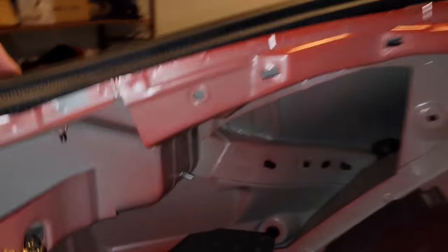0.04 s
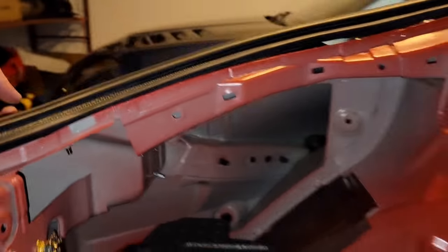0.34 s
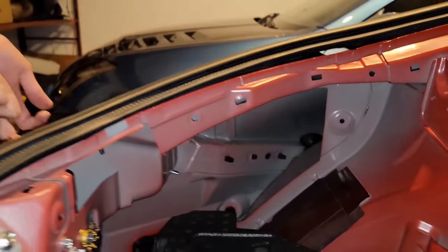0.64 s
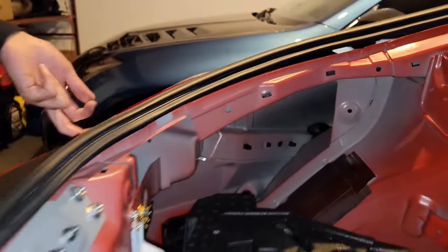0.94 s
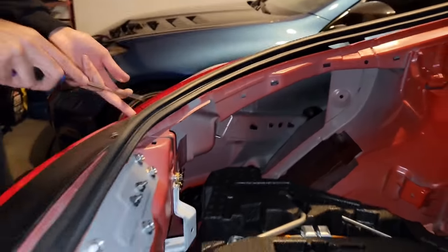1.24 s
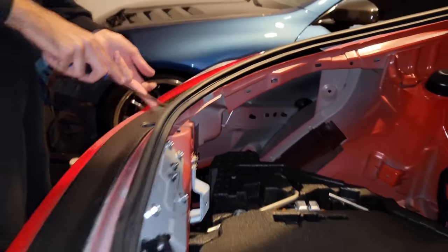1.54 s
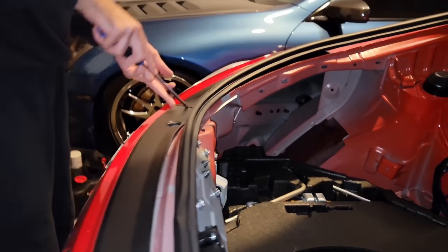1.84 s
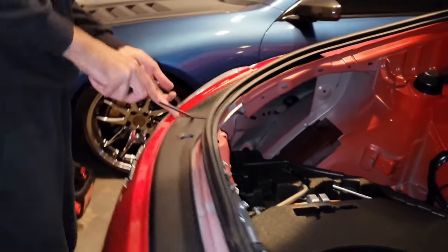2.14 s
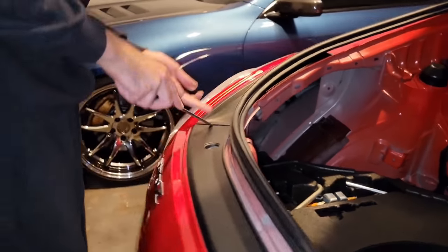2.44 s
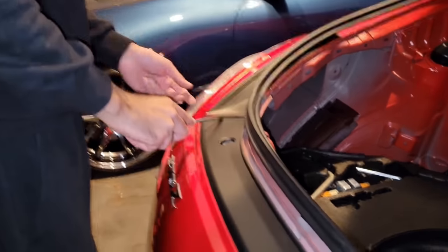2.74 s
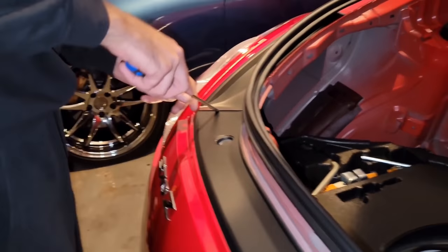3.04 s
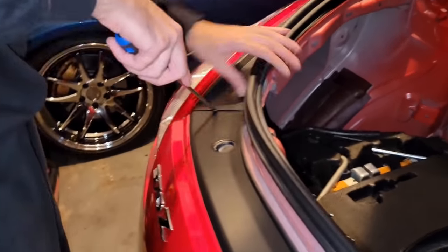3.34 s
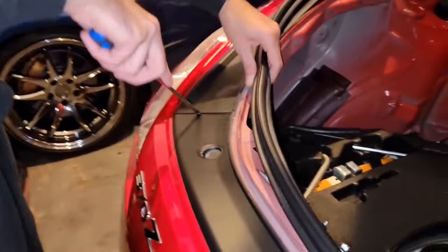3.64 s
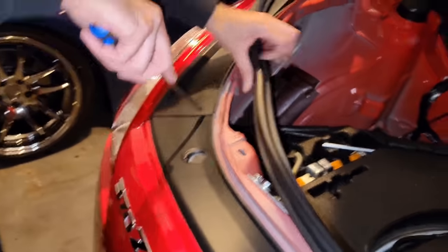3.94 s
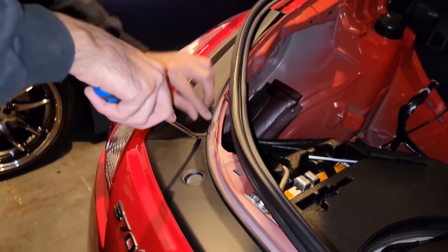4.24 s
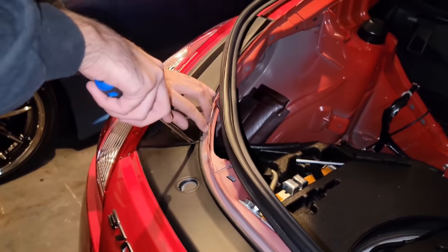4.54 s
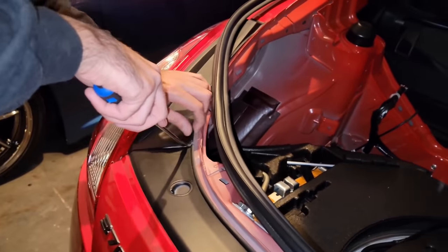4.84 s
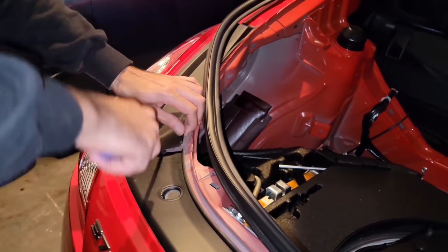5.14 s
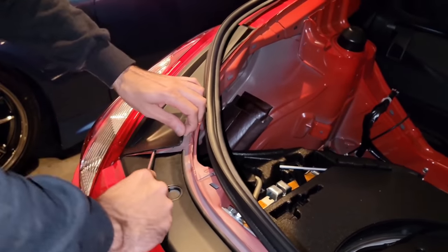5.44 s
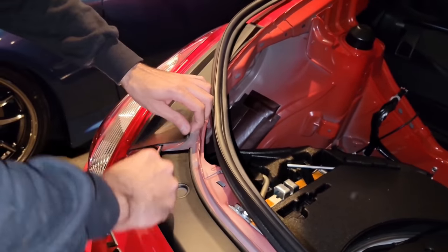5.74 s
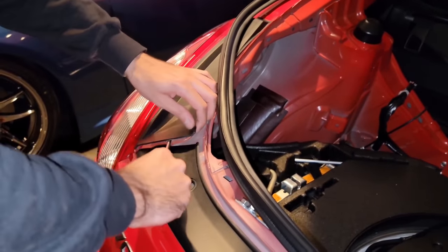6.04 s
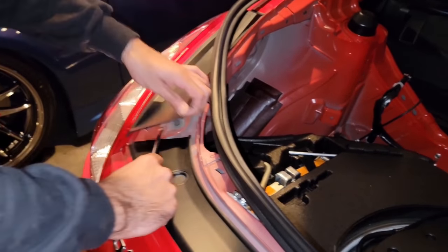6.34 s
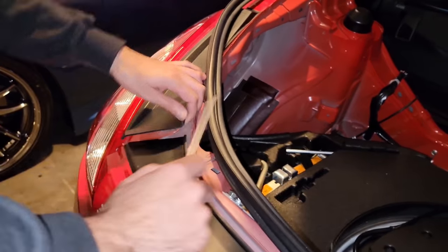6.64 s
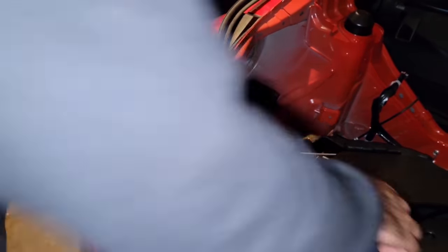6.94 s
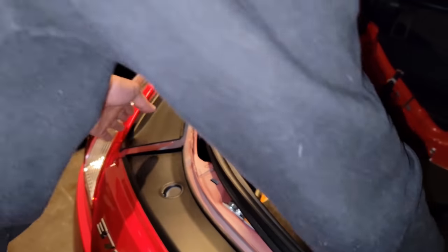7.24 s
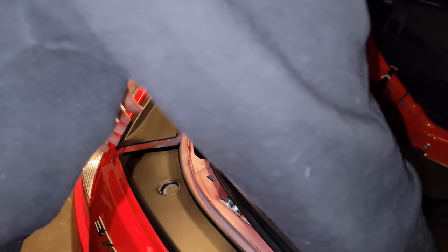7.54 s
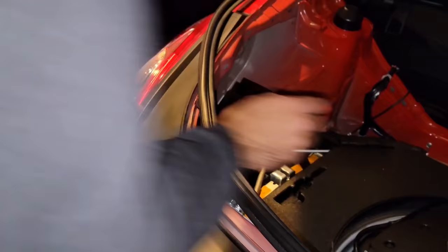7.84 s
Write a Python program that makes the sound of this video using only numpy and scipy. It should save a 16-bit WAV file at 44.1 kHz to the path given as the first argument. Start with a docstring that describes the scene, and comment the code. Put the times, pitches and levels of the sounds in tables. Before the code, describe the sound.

In an echoing garage, a rubber seal is peeled back and a plastic car panel is pried loose with sharp pops and knocks.

```python
"""An echoing garage with a low rumble, heard through a hand-held phone at the boot of a car.
Rubber weatherstrip is peeled from the rim: stick-slip friction makes it hiss, squeak and judder.
A hand tool taps, scrapes and pries up a plastic trim panel, and loose things are put down in the boot.
The loudest sounds are the clips snapping free: each is an impulse that sets the panel and the steel
body vibrating in their damped modes."""
import sys
import numpy as np
from scipy import signal
from scipy.fft import rfft, irfft
from scipy.io import wavfile
from scipy.ndimage import uniform_filter1d

SR = 44100
rng = np.random.default_rng(int(sys.argv[2]) if len(sys.argv) > 2 else 0)


def store_wav(level_fs):
    """Save 16-bit WAV to argv[1]."""
    pcm = np.round(np.clip(np.atleast_2d(level_fs), -1, 1) * 32767)
    wavfile.write(sys.argv[1], SR, pcm.T.astype(np.int16))


N = 352359
T = np.arange(12000) / SR  # time since an impact, s
BANDS_HZ = 44 * 2 ** (np.arange(18) / 2)  # half-octave centres

# spectrum of the garage's background noise: frequency_hz, level_db
AIR_SPECTRUM = [(20, -26.5), (40, -15), (63, -9.5), (85, -10.5), (105, -16), (140, -30), (200, -25.5),
                (350, -25.5), (500, -33), (750, -28.5), (1500, -40.5), (3000, -45), (5000, -55),
                (7000, -51.5), (15000, -67)]
# swell of the rumble: start_s, length_s, level_db
RUMBLE_SWELL = [(3.34, 0.33, -51)]
# envelope of the drone: time_s, level_db
DRONE_LEVEL = [(0, -57), (.2, -47), (.28, -85), (.36, -45), (.48, -43.5), (.68, -48.5), (.75, -59),
               (.87, -50), (1.18, -52.5), (1.4, -44.5), (1.9, -51), (2.7, -54.5), (4, -54.5), (8, -79)]

# spectrum of friction noise: frequency_hz, level_db
RUB_SPECTRUM = [(100, -15), (600, 0.5), (1200, 1.5), (2400, 4.5), (4000, -0.5), (7000, -3.5), (10000, -14),
                (14000, -13.5)]
# weatherstrip sliding off its flange and hands brushing it: start_s, length_s, level_db
SEAL_STROKES = [(.25, 0.38, -74), (.96, 0.18, -66.5), (1.46, .27, -58.5), (2.25, 0.38, -65),
                (2.62, 0.73, -61), (3.19, 0.27, -53.5), (3.387, 0.056, -44.5), (3.425, 0.05, -52),
                (3.466, 0.06, -47), (3.57, 0.15, -45), (3.705, 0.083, -44.5), (5.3, 0.28, -58.5),
                (6.13, 0.72, -58.5), (6.78, 0.46, -70)]
# resonances of the rubber channel: centre_hz, width_hz, gain_db
SEAL_PEAKS = [(1210, 82, 8), (2040, 85, 8), (2440, 130, 4.5), (2860, 2400, 1.5)]
# hand and tool scraping the hollow trim: start_s, length_s, level_db
TRIM_SCRAPES = [(-.015, 0.073, -44.5), (.05, 0.073, -40), (1.44, 0.086, -44), (1.52, 0.17, -48.5),
                (4.937, 0.083, -46)]
# resonances of the scraped trim: centre_hz, width_hz, gain_db
TRIM_PEAKS = [(427, 46, 6.4), (615, 87, 20.5), (905, 130, 14.4), (1260, 33, 14)]
# squeaks of the sliding rubber: start_s, length_s, first_hz, last_hz, level_db
SQUEAKS = [(3.198, 0.1, 2570, 2900, -56.5), (3.379, 0.027, 2306, 2040, -42),
           (3.41, 0.11, 2960, 2590, -50.5), (3.581, 0.13, 2096, 1282, -51), (3.585, 0.09, 3150, 2410, -51)]
# rubber juddering on its flange: start_s, level_db, pitch_hz
JUDDERS = [(4.886, -33, 325.6)]
# padded bumps: start_s, level_db, pitch_hz, t60_s
BUMPS = [(3.185, -35, 291, 0.032), (3.741, -29.5, 447, 0.029), (4.846, -43, 348, 0.068),
         (6.494, -33, 512, 0.11), (7.457, -17.5, 531, 0.12), (7.48, -25, 535, 0.14),
         (7.595, -26.5, 437, 0.081)]
# the rubber lip flicking off its flange: start_s, level_db, t60_s, pan_db
FLICKS = [(3.39, -12, 0.045, -9), (3.4075, -0.5, 0.0076, 6.5), (3.417, -5.5, 0.012, -4),
          (3.435, -8, 0.011, 4), (3.713, -7, 0.12, -6), (3.735, -8.5, 0.11, -9.5)]

# flicks of the tool's steel shaft: start_s, level_db
PINGS = [(4.047, -16), (4.304, -9.5), (4.422, -20.5), (7.669, 15)]
# distinct modes of the shaft: frequency_hz, level_db, t60_s
SHAFT_MODES = [(2270, 4, 0.079), (3290, -6, 0.15), (3560, -6, 0.12), (4930, -7, .06)]
# spectrum of its crowded modes: frequency_hz, level_db
SHAFT_SPECTRUM = [(2200, -4), (3000, -3), (3550, 4.5), (4000, -8.5), (4400, -5), (5200, -25), (6500, -28)]
# a hard hollow piece put down, one end after the other: start_s, level_db, rebound_lag_s, rebound_db
CLACKS = [(7.282, 1, .0075, 0), (7.3823, 2.5, .009, -6.5)]
# modes of the hollow piece: frequency_hz, level_db, t60_s
PIECE_MODES = [(315.6, -15, 0.2), (554, -3.5, 0.072), (620, -8, 0.082), (742, 0.5, 0.061), (889, 3.5, 0.04),
               (943, -1, 0.027), (1408, -8.5, 0.035), (1710, -12.5, 0.033), (1828, -3.5, 0.046),
               (1900, -16, 0.041), (2100, -16, 0.039), (2806, -10, 0.05), (2930, -9.5, 0.065),
               (3140, -27, 0.045), (4136, -10, 0.037), (4800, -23, 0.042), (7260, -14, 0.02)]
# spectrum of its impact: frequency_hz, level_db
CLACK_SPECTRUM = [(100, -13.5), (300, -12), (560, -15), (820, 8.5), (1170, -6), (1550, 4.5), (1850, 3),
                  (2330, -5.5), (2800, 0.5), (3400, -6), (4400, -10.5), (6000, -14), (9000, -18.5),
                  (15000, -38.5)]

# modes of panel and boot together: frequency_hz, level_db, t60_s
PANEL_MODES = [(175, -7.5, 0.28), (261.5, -8, 0.26), (392, 5, 0.098), (515, -2, 0.14), (556.5, 3, 0.073),
               (632.4, -4.5, 0.089), (787, 3.5, 0.16), (956, -3, 0.066), (1117, 2.5, 0.13),
               (1197, 10, 0.037), (1340, 8, 0.064), (1435, 4, 0.037), (1680, -0.5, 0.08),
               (2240, -9.5, 0.085), (2520, 1, 0.044), (2710, -13, 0.3), (3420, -10.5, 0.084),
               (4200, -12, 0.1)]
# tool and fingers touching the trim, each at a spot with its own resonance:
# start_s, level_db, bass_db, treble_db, t60_s, spot_hz, spot_db
TAPS = [(.001, -5.5, 6.5, -24, 0.12, 430, 6), (.058, -14, 0, -20, .06, 590, 8),
        (.072, -12, -12, -15, .06, 1150, 1), (.094, -14.5, -6, -2, 0.064, 577, 11),
        (1.114, -14.5, 7.5, -31, 0.14, 1520, 2), (1.152, -24, -13, -32, .07, 2040, 10),
        (1.445, -4, 11, -42, 0.074, 830, 6), (1.455, 7, 10.5, -45, 0.11, 543, 4),
        (1.589, 5, 7, -27, 0.11, 1550, -5), (2.323, -13.5, 12, -47, 0.067, 1280, -18),
        (3.483, -17.5, 20, -28, 0.13, 474, -6), (4.043, -14, 13, -10, 0.061, 3000, 15),
        (4.304, -4.5, 10.5, -19.5, 0.11, 1293, 5.5), (4.428, -17, -1, -32, 0.24, 1330, 3),
        (4.526, -18.5, 14, -53, 0.14, 482, 10), (4.948, -4.5, 4, -59, 0.19, 1180, -8),
        (4.972, -2.5, 3, -52, 0.19, 1200, 5), (5.011, 3, 5, -36, 0.095, 506, 3.5),
        (5.207, 0.5, 5.5, -34, 0.096, 518, 3), (5.327, 5.5, 4.5, -61, 0.11, 1700, 2),
        (6.074, 5.5, 5.5, -36.5, 0.1, 1240, 3), (6.492, 5, 4.5, -22, 0.13, 486, -2),
        (6.539, -4, 9.5, -19, .1, 690, -7), (6.67, -15.5, 5, -21, 0.099, 1950, 2),
        (6.72, -16, 14.5, -31, .06, 684, 7), (7.5949, -10, 16, -47, .07, 850, 8)]
# spectrum of a clip's crack: frequency_hz, level_db
CRACK_SPECTRUM = [(300, -23), (1000, -10), (1600, -9), (2200, -4), (3200, -10), (5000, -12), (7200, -19),
                  (11000, -34.5), (15000, -32.5)]
# spectrum of the panel's response to any snap: frequency_hz, level_db
SNAP_SPECTRUM = [(45, 0), (150, 6.5), (450, 3.5), (1150, 0.5), (1800, 0), (2500, -3), (5000, -17),
                 (7500, -16), (11000, -28), (15000, -34.5)]
# clips letting go: start_s, level_db, thump_db, tilt_db_per_octave, spot_hz, spot_db,
# crack_db, crack_hz, panel_build_s, panel_t60_s, clip_hz, clip_db, pan_db
SNAPS = [(2.746, 21, -17.5, -1.33, 348, -1, -3.5, 2380, 0.0042, 0.17, 2830, 7, -1),
         (3.975, 2.5, -2.5, -2.4, 1255, 7.5, -1.5, 2030, 0.0034, 0.15, 2800, 5, -2),
         (5.7218, 26.5, 1, 1.32, 620, 2, 0, 1238, 0.0055, 0.16, 1810, 0.5, -2),
         (6.3106, 20, 9, 1.9, 2174, 7.5, 9.5, 2240, 0.021, 0.19, 2550, 8, -1.5),
         (7.6674, 13, -15, -2.8, 1425, 4.5, -1.5, 3200, 0.013, 0.18, 2060, 8, -2.5),
         (7.9411, 23.5, 3, 1.5, 417, 8.5, 0.5, 2600, 0.0028, 0.18, 2570, 7.5, -3)]


def undb(db):
    """Amplitude ratio of a level in decibels."""
    return 10 ** (np.asarray(db) / 20)


def along(hz, points):
    """Interpolation of (frequency_hz, value) points on a logarithmic frequency axis."""
    f, value = np.transpose(points)
    return np.interp(np.log(np.maximum(hz, 1)), np.log(f), value)


def add(out, start_s, sound, pan_db=0):
    """Superposition of a sound on the mix; pan_db is the left level minus the right."""
    i = max(int(start_s * SR), 0)
    out[:, i:i + sound.shape[-1]] += (sound * undb([[pan_db / 2], [-pan_db / 2]]))[:, :N - i]


def noise_pair(correlation):
    """Partial coherence: left and right white noise from a common and an opposed part."""
    mid, side = rng.standard_normal((2, N))
    return np.sqrt((1 + correlation) / 2) * mid + np.sqrt((1 - correlation) / 2) * np.array([side, -side])


def tint(x, spectrum, peaks=()):
    """Source and filter: a spectral envelope with Lorentzian resonances, scaled to rms 1."""
    f = np.fft.rfftfreq(x.shape[-1], 1 / SR)
    power_gain = 1 + sum(undb(db) ** 2 / (1 + (2 * (f - hz) / width) ** 2) for hz, width, db in peaks)
    y = irfft(rfft(x) * undb(along(f, spectrum)) * np.sqrt(power_gain), x.shape[-1])
    return y / np.sqrt(np.mean(y ** 2))


def waver(count):
    """Band-limited fluctuation through count random values, with a spread near 1."""
    return signal.resample(rng.standard_normal(count), N)


def swells(strokes, rise_share=0.23, steepness=0.94):
    """Amplitude envelope in which each stroke rises quickly and eases off."""
    t, out = np.arange(N) / SR, 0
    for start_s, length_s, db in strokes:
        arc = np.interp(t, [start_s, start_s + length_s * rise_share, start_s + length_s], [0, 1, 0])
        out = out + undb(db) * np.sin(np.pi / 2 * arc) ** steepness
    return out


def hump(centre_hz, db, octaves):
    """A broad resonance, as a gain in dB for each band."""
    return db * np.exp(-(np.log2(BANDS_HZ / centre_hz) / octaves) ** 2)


def coherent_bass(treble_correlation):
    """Correlation against frequency: long waves reach both microphones alike."""
    return lambda hz: treble_correlation + (1 - treble_correlation) / (1 + (hz / 300) ** 4)


def dense_ring(spectrum, envelope, correlation, size=len(T)):
    """High modal overlap: crowded modes act as half-octave noise bands, each with its own envelope."""
    f, out = np.fft.rfftfreq(size, 1 / SR), 0
    mid, side = rfft(rng.standard_normal((2, size)))
    gain, octave = undb(along(f, spectrum)), np.log2(np.maximum(f, 1))
    for hz in BANDS_HZ:
        band = gain * (abs(octave - np.log2(hz)) < 1 / 4)
        c = correlation(hz)
        noise = np.sqrt(1 + c) * mid + np.sqrt(1 - c) * np.array([side, -side])
        ring = irfft(band * noise, size) * envelope(hz)
        energy_share = np.mean(band ** 2)
        out = out + ring * np.sqrt(energy_share / np.sum(ring ** 2, axis=1, keepdims=True))
    return out


def blow(spectrum, t60, correlation, crack_t60=0.0034, crack_db=10, crack_hz=1800,
         build_s=0.013, contact_s=0.0015, damping_hz=11000):
    """Impact response: a brief treble crack, bass that builds slowly, damping that grows with pitch."""
    def envelope(hz):
        attack = 1 - np.exp(-T / (contact_s + build_s * 500 / hz))
        crack = undb(crack_db) * hz / (hz + crack_hz) * undb(-60 * T / crack_t60)
        decay = undb(-60 * T / t60 * (1 + (hz / damping_hz) ** 2))
        return attack * (crack + decay)
    return dense_ring(spectrum, envelope, coherent_bass(correlation))


def modes(table, phase_gap_rad, scatter_db=2, detune=0.0068, rise_s=0.0012):
    """Free vibration: damped sinusoids, varied at each strike and out of phase at the two microphones."""
    out = 0
    for hz, db, t60 in table:
        pitch_draw, phase_draw, gap_draw, level_draw = rng.standard_normal(4)
        phase = 2 * np.pi * (hz * (1 + detune * pitch_draw) * T + phase_draw)
        right_shift = np.array([[0], [1]]) * (phase_gap_rad + gap_draw / 2) * min(hz / 500, 1)
        out = out + undb(db + scatter_db * level_draw - 60 * T / t60) * np.sin(phase + right_shift)
    return out * (1 - np.exp(-T / rise_s))


def contact_spectrum(bass_db, treble_db):
    """Spectrum of a light impact: its weight sets the bass, its hardness the treble."""
    return [(60, bass_db - 14), (150, bass_db - 2), (330, bass_db), (800, 1), (1500, 0), (2700, -5),
            (4500, treble_db / 2 - 3), (7000, treble_db + 1), (10000, treble_db - 13),
            (14000, treble_db - 17)]


def background(rumble_db=-52, waver_db=1, air_db=-54, crossover_hz=230):
    """Ambient noise: a wavering, nearly coherent rumble below steady, incoherent air noise."""
    out = np.zeros((2, N))
    low, high = (signal.butter(4, crossover_hz, kind, fs=SR, output="sos") for kind in ("low", "high"))
    envelope = undb(rumble_db + waver_db * waver(24)) + swells(RUMBLE_SWELL)
    add(out, 0, envelope * signal.sosfilt(low, tint(noise_pair(0.9), AIR_SPECTRUM)), pan_db=-2)
    add(out, 0, undb(air_db) * signal.sosfilt(high, tint(noise_pair(0.024), AIR_SPECTRUM)))
    return out


def drone(first_hz=66.2, sag_hz_per_s=1.4, hum_hz=51.2, hum_db=-64):
    """A linear downward glide, like a far engine slowing, beside a faint steady hum."""
    t, out = np.arange(N) / SR, np.zeros((2, N))
    phase = 2 * np.pi * np.cumsum(first_hz - sag_hz_per_s * t) / SR
    tone = undb(np.interp(t, *np.transpose(DRONE_LEVEL))) * np.sin(phase)
    hum = undb(hum_db) * np.sin(2 * np.pi * hum_hz * t)
    add(out, 0, np.sqrt(2) * (tone + hum), pan_db=-3.5)
    return out


def rubbing(strokes, peaks, grain_db, pan_db, grain_samples=60, grip_waver_db=2):
    """Stick-slip friction: grainy hiss under an uneven grip excites the resonances of what is rubbed."""
    out = np.zeros((2, N))
    grain_gains = undb(grain_db * rng.standard_normal(N // grain_samples + 1))
    grains = uniform_filter1d(np.repeat(grain_gains, grain_samples)[:N], size=30)
    grip = undb(grip_waver_db * waver(700))
    hiss = tint(noise_pair(0.16) * grains, RUB_SPECTRUM, peaks)
    add(out, 0, grip * swells(strokes) * hiss, pan_db)
    return out


def seal_squeaks(width_hz=420):
    """Rough stick-slip oscillation: a narrow band whose pitch glides as the rubber stretches."""
    out = np.zeros((2, N))
    roughness = signal.sosfilt(signal.butter(2, width_hz / 2, fs=SR, output="sos"), noise_pair(0.22))
    roughness /= roughness.std()
    for start_s, length_s, first_hz, last_hz, db in SQUEAKS:
        n, i = int(length_s * SR), int(start_s * SR)
        phase = 2 * np.pi * np.cumsum(np.geomspace(first_hz, last_hz, n)) / SR
        tone = np.sqrt(2) * np.sin(phase) * np.hanning(n)
        add(out, start_s, undb(db) * tone * roughness[:, i:i + n], pan_db=-2)
    return out


def seal_judder(slips=4, period_s=0.03, t60=0.077):
    """Relaxation oscillation: evenly spaced slips of the rubber, listed as padded bumps."""
    return [(start_s + k * period_s, db, hz, t60) for start_s, db, hz in JUDDERS for k in range(slips)]


def bumps(contacts):
    """A soft contact carries little treble, so it excites only low resonances and a dull thud."""
    out = np.zeros((2, N))
    for start_s, db, hz, t60 in contacts:
        spectrum = [(hz / 8, -20), (hz / 3, -14), (hz, 0), (hz * 2, -14), (hz * 8, -45), (15000, -65)]
        thud = undb(38) * blow(spectrum, t60, correlation=0.13)
        tone = modes([(hz, 0, t60), (hz * 0.303, -20, t60)], 0.38, scatter_db=0, rise_s=0.004)
        add(out, start_s, undb(db) * (tone + thud), pan_db=-2)
    return out


def seal_flicks(bass_db_per_s=100, lead_s=0.00108):
    """Elastic release: the lip ticks, and the longer it flaps the more bass it shakes from the flange."""
    out = np.zeros((2, N))
    for start_s, db, t60, pan_db in FLICKS:
        spectrum = contact_spectrum(bass_db_per_s * t60, treble_db=-11)
        tick = blow(spectrum, t60, correlation=0.26, crack_t60=t60 / 4, crack_db=4,
                    build_s=0.0011, contact_s=t60 / 25)
        add(out, start_s - lead_s, undb(db - 1) * tick, pan_db)
    return out


def shaft_pings():
    """Free vibration of the tool's steel shaft after it slips off an edge."""
    out = np.zeros((2, N))
    for start_s, db in PINGS:
        hit = blow(SHAFT_SPECTRUM, t60=0.19, correlation=0.4, crack_db=4)
        ring = undb(-41) * modes(SHAFT_MODES, 0.5, detune=0.0046)
        add(out, start_s, undb(db) * (hit + ring), pan_db=-3)
    return out


def piece_clacks(strikes=3, spacing_exponent=0.9):
    """Rebound: the hollow piece chatters at shrinking intervals, each strike exciting its modes."""
    out = np.zeros((2, N))
    for start_s, db, lag_s, rebound_db in CLACKS:
        for k in range(strikes):
            ring = undb(-16) * modes(PIECE_MODES, 1.97, detune=0.0024, rise_s=0.0015)
            hit = undb(15.5) * blow(CLACK_SPECTRUM, t60=0.12, correlation=-0.29,
                                    build_s=0.0018, damping_hz=9000)
            strike_s = start_s + lag_s * k ** spacing_exponent
            add(out, strike_s, undb(db + k * rebound_db) * (ring + hit), pan_db=-3)
    return out


def trim_taps(spot_t60=0.047, lead_s=0.0005):
    """Point excitation: a light contact rings the panel's modes and the resonance of the touched spot."""
    out = np.zeros((2, N))
    for start_s, db, bass_db, treble_db, t60, spot_hz, spot_db in TAPS:
        spectrum = contact_spectrum(bass_db, treble_db)
        spot_gain = undb(spot_db - 39 + along(spot_hz, spectrum))
        spot = spot_gain * modes([(spot_hz, 0, spot_t60)], 0.6, scatter_db=0)
        panel = undb(-55) * modes(PANEL_MODES, 1.1, rise_s=0.0019)
        hit = undb(-1) * blow(spectrum, t60, correlation=0.57, crack_t60=0.0052, crack_db=13,
                              build_s=0.012, contact_s=0.002)
        pan_db = np.interp(start_s, [1.5, 3], [2, -3.5])  # drifts right as the phone turns
        add(out, start_s - lead_s, undb(db) * (hit + panel + spot), pan_db)
    return out


def barb_crack(centre_hz, barbs=3, first_s=0.0008, gap_s=0.0023, tick_s=0.00095):
    ages = np.maximum(T - first_s - gap_s * np.arange(barbs)[:, None], 0) / tick_s
    ticks = np.sum(ages * np.exp(-ages), axis=0)
    band_db = along(BANDS_HZ, CRACK_SPECTRUM) + hump(centre_hz, db=7, octaves=0.4)
    return dense_ring(list(zip(BANDS_HZ, band_db)), lambda hz: ticks, correlation=lambda hz: 0.29)


def clip_snaps(spot_t60=0.095, clip_t60=0.14, pivot_hz=1200, thump_hz=220, panel_lag_s=0.00128):
    """Impulse excitation: a freed clip cracks and rings, then the panel and the levered spot respond."""
    out = np.zeros((2, N))
    for (start_s, db, thump_db, tilt, spot_hz, spot_db, crack_db, crack_hz,
         build_s, t60, clip_hz, clip_db, pan_db) in SNAPS:
        band_db = along(BANDS_HZ, SNAP_SPECTRUM) + tilt * np.log2(BANDS_HZ / pivot_hz)
        band_db += thump_db / (1 + (BANDS_HZ / thump_hz) ** 2)
        band_db += hump(spot_hz, db=3, octaves=1)
        spectrum = list(zip(BANDS_HZ, band_db))
        driven_modes = [(hz, level + along(hz, spectrum), ring_s) for hz, level, ring_s in PANEL_MODES]
        panel = undb(-50) * modes(driven_modes, 1.4, detune=0.0029, rise_s=build_s / 2)
        spot = undb(spot_db - 39) * modes([(spot_hz, 0, spot_t60)], 1.3, scatter_db=3,
                                          detune=0.002, rise_s=0.0017)
        crack = undb(crack_db) * barb_crack(crack_hz)
        clip = undb(clip_db - 49) * modes([(clip_hz, 0, clip_t60)], 4.2, scatter_db=3, detune=0.002)
        body = blow(spectrum, t60, correlation=0, build_s=build_s, contact_s=0.0024, damping_hz=8100)
        add(out, start_s, undb(db) * (crack + clip), pan_db)
        add(out, start_s + panel_lag_s, undb(db) * (body + panel + spot), pan_db)
    return out


def garage_echo(x, build_s=0.0044):
    """Reverberation: convolution with a diffuse decay in which the bass lasts longest."""
    t = np.arange(SR) / SR
    t60_by_hz = [(80, 0.65), (250, 0.49), (500, 0.5), (1000, 0.47), (2500, 0.57), (6000, 0.44),
                 (14000, 0.17)]
    spectrum = [(60, -8), (250, -2.5), (500, -6), (1000, -7.5), (3000, -10.5), (7000, -10.5),
                (14000, -15.5)]
    onset = 1 - np.exp(-(t / build_s) ** 2)
    response = dense_ring(spectrum, lambda hz: onset * undb(-60 * t / along(hz, t60_by_hz)),
                          coherent_bass(-0.51), len(t))
    return signal.fftconvolve(x, response, axes=1)[:, :N]


def scene(friction_echo_db=-3):
    """Superposition of direct sound, echo and background; friction feeds the echo less than impacts do."""
    friction = seal_squeaks() + rubbing(SEAL_STROKES, SEAL_PEAKS, grain_db=-0.5, pan_db=0.5)
    friction += rubbing(TRIM_SCRAPES, TRIM_PEAKS, grain_db=1, pan_db=0)
    impacts = clip_snaps() + trim_taps() + seal_flicks() + piece_clacks() + shaft_pings()
    impacts += bumps(BUMPS + seal_judder())
    left, right = impacts + friction
    direct = np.array([left, np.pad(right, (4, 0))[:N]])  # reaches the left microphone 4 samples sooner
    return direct + garage_echo(impacts + undb(friction_echo_db) * friction) + drone() + background()


def record(dry, top_hz=14800):
    """Soft saturation and band limiting: the phone rounds the highest peaks and cuts the top."""
    lowpass = signal.ellip(8, 0.2, 70, top_hz, fs=SR, output="sos")
    return signal.sosfilt(lowpass, np.tanh(0.7 * dry) / 0.96)


dry = scene()
out = record(dry)
store_wav(out)
```